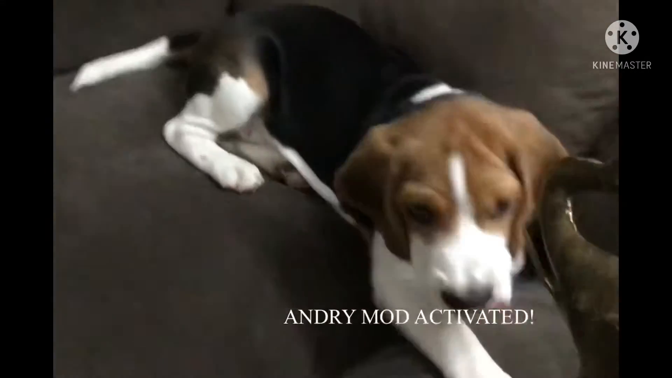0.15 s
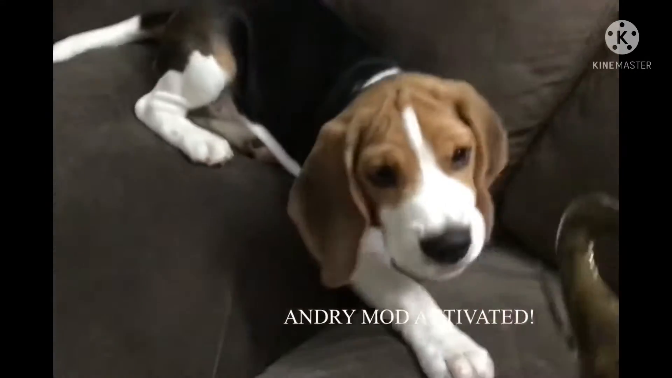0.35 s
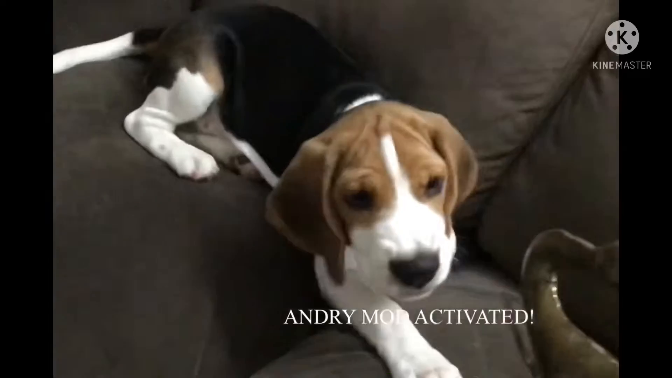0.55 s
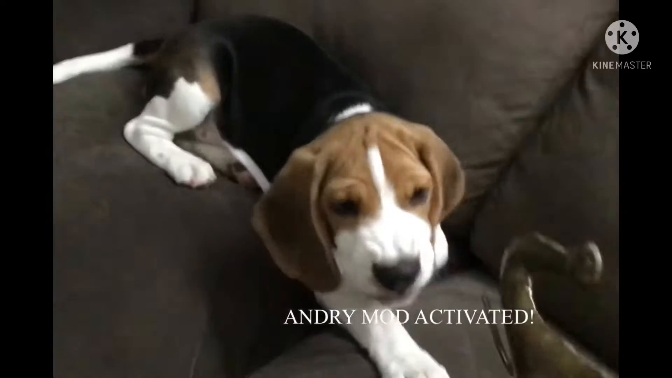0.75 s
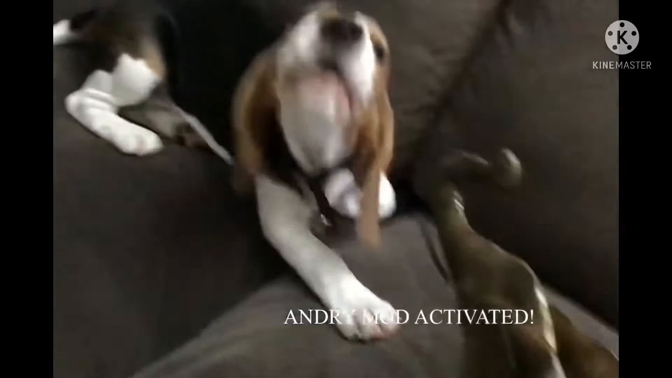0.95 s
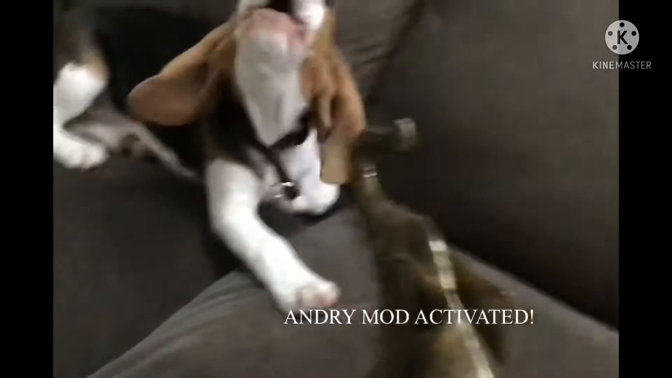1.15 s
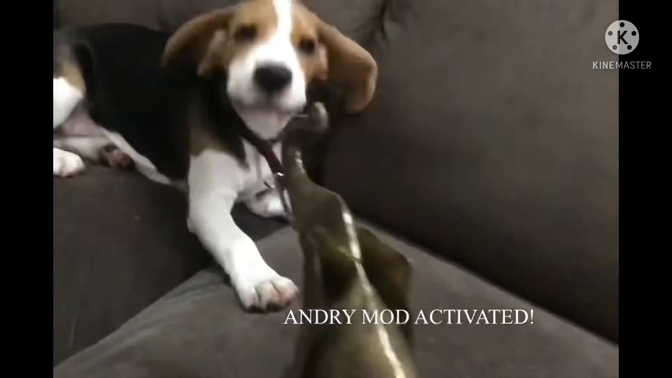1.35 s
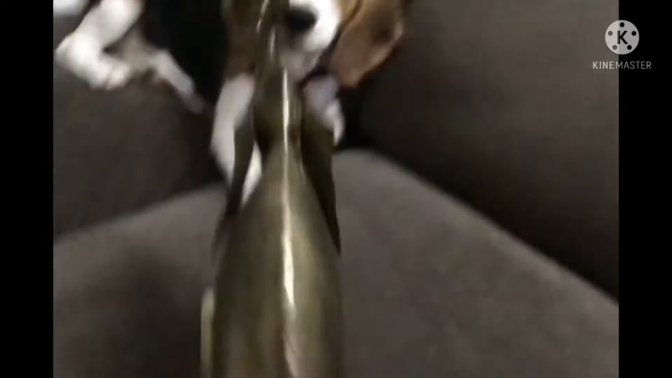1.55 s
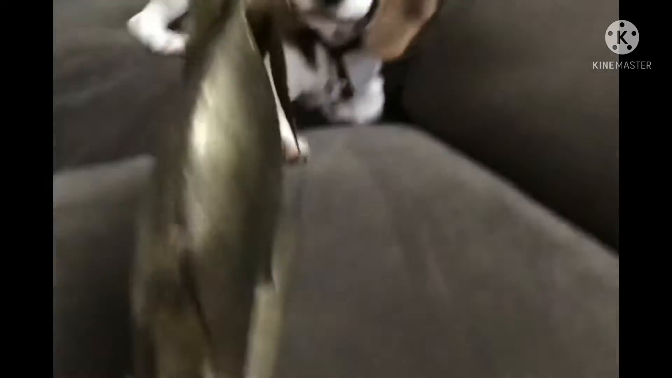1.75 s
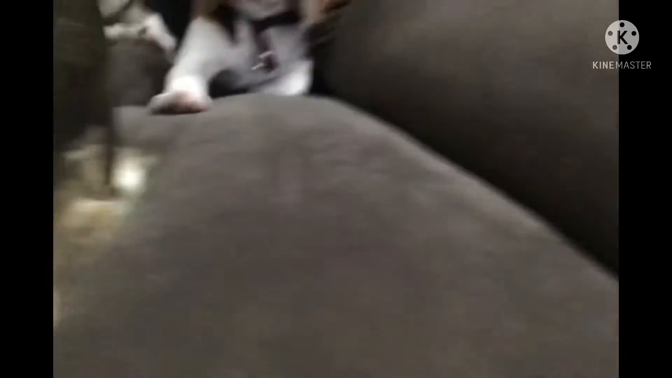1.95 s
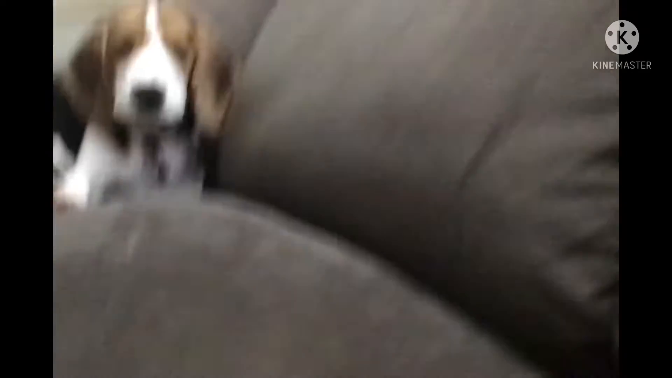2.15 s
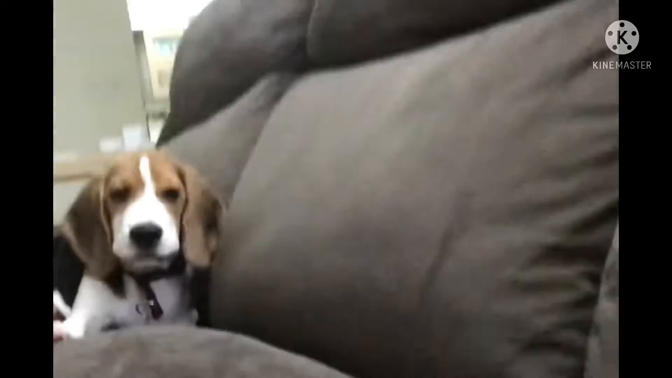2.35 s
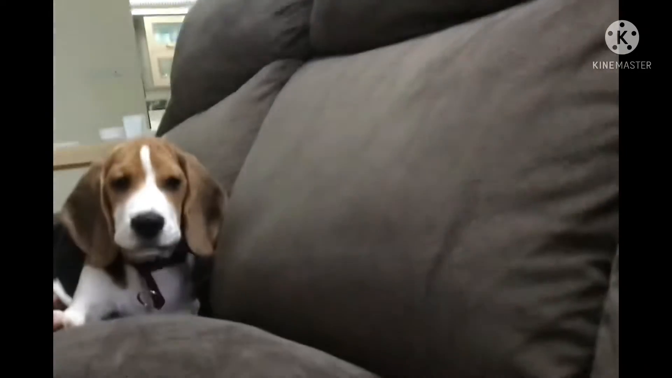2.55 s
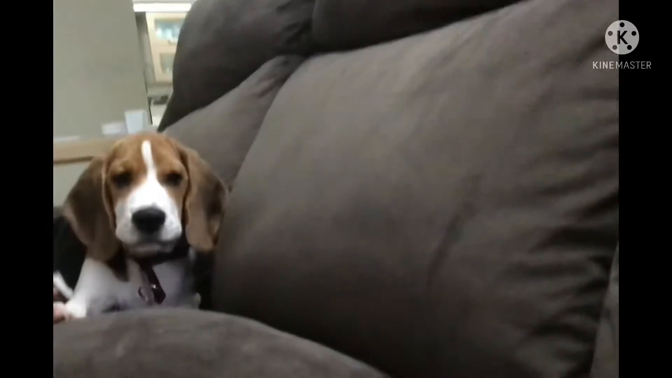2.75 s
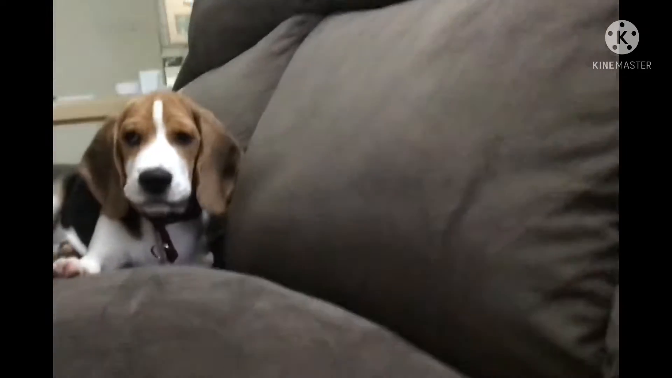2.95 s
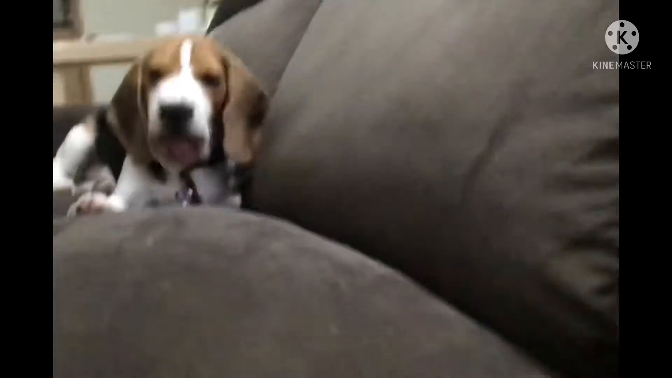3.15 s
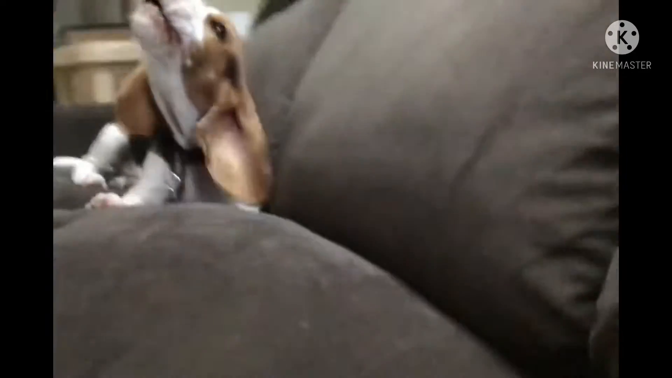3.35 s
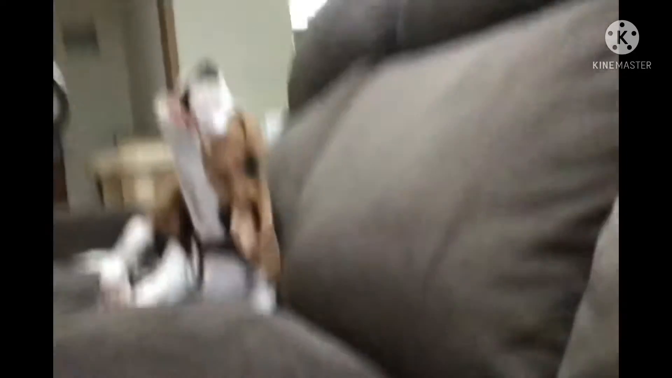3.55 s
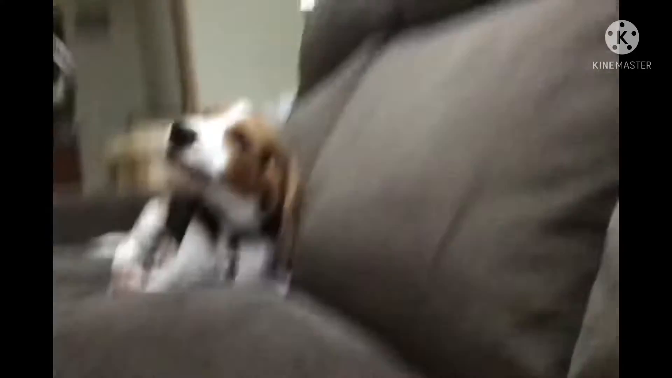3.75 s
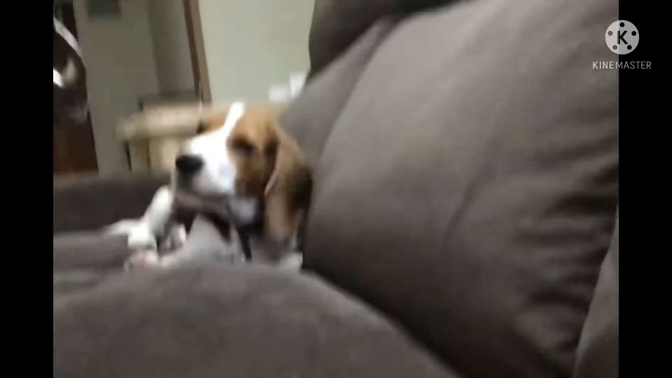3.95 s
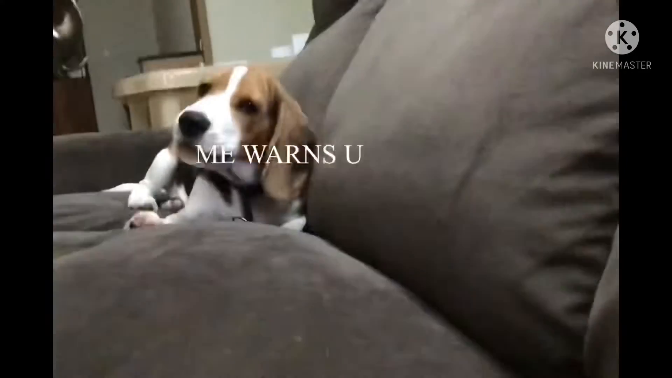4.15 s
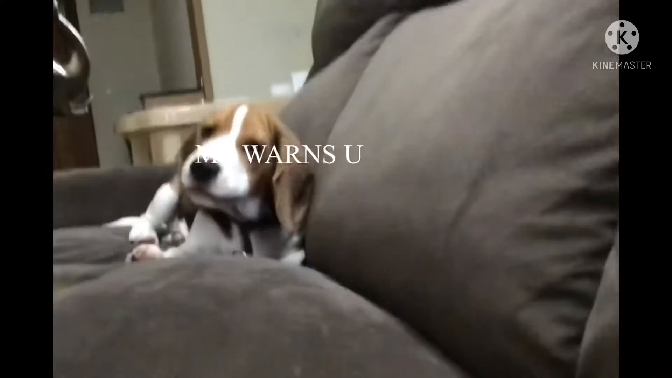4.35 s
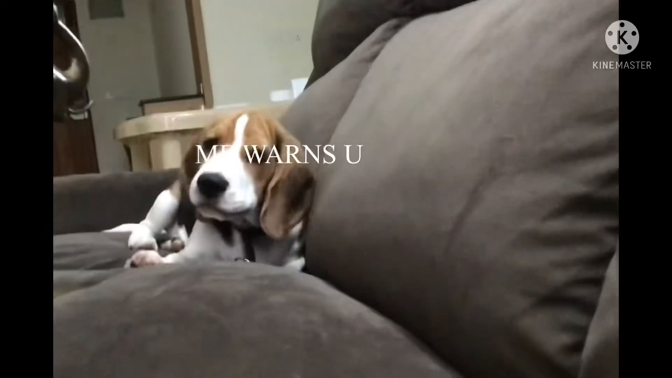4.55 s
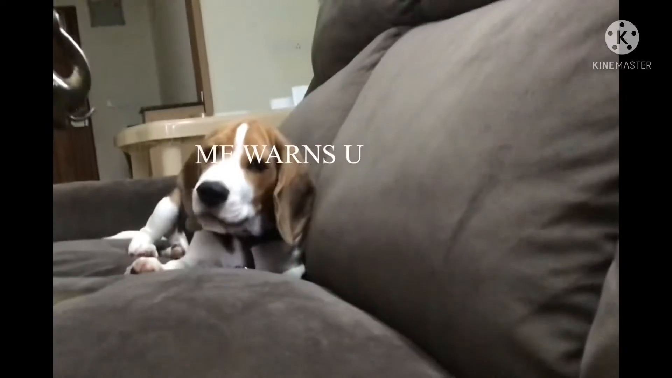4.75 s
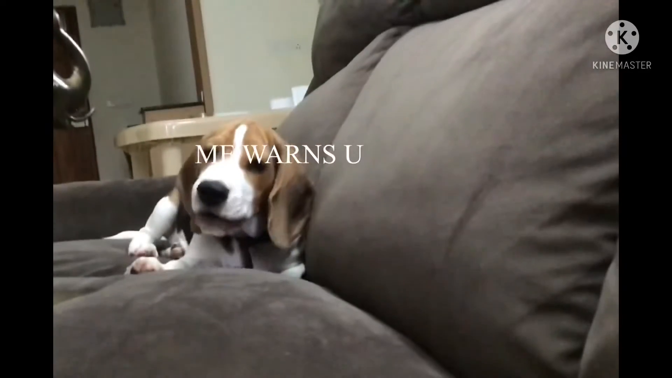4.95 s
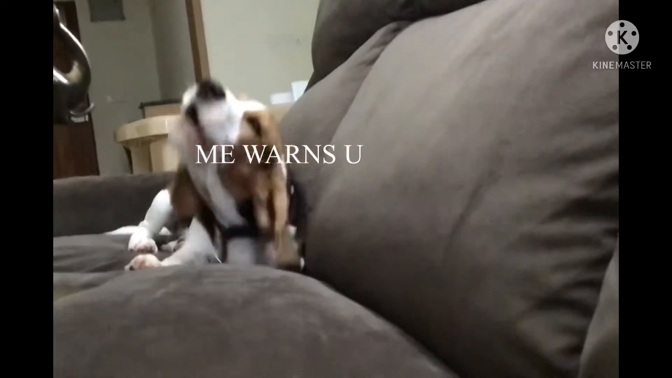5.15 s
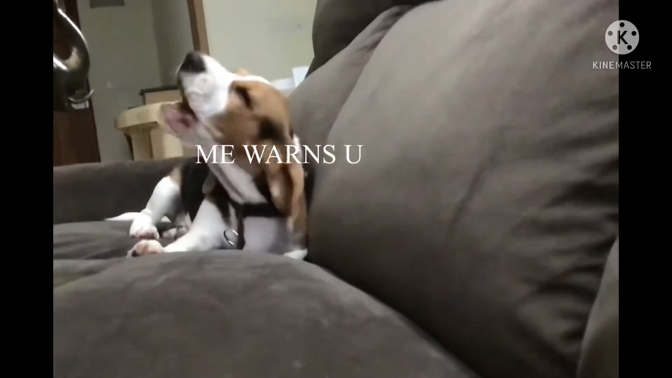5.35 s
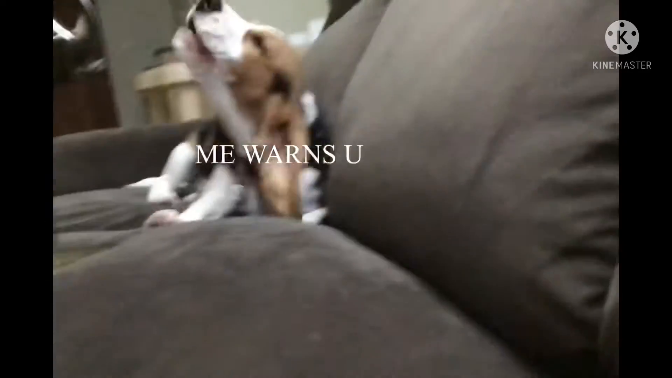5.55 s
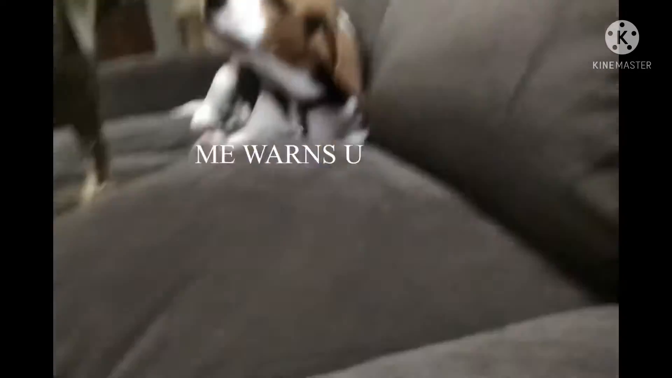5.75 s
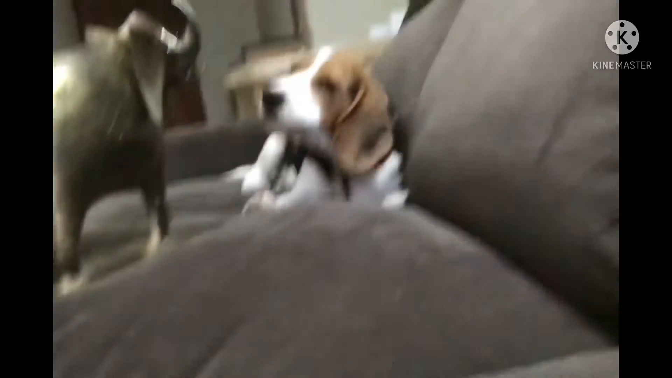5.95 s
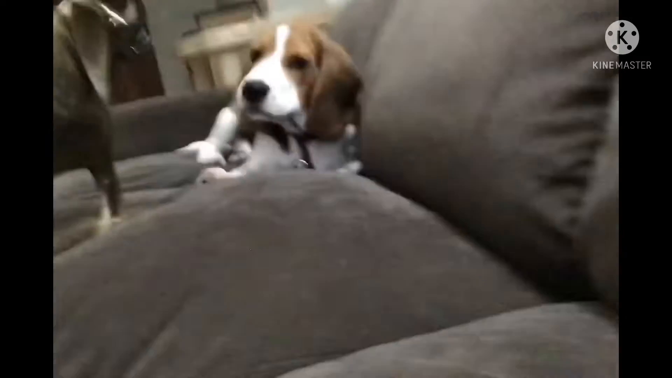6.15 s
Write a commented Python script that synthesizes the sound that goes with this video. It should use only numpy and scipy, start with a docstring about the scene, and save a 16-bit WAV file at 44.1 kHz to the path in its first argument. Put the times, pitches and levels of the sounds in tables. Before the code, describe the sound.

Close, handheld indoor sound of a puppy on a padded sofa. Faint rumble, hush and cloth rustle, a tiny low purr of taps, then a very loud double bark that overloads slightly. Cushion pops and soft thumps follow. A second double bark comes midway, then a quieter pause, and a hoarser, rougher double bark near the end. Every bark leaps up, then slides down, leaving a short room echo.

```python
"""Faint rumble, room hush and rustling cloth come first, then a short low purr of taps.
A puppy on a sofa then bays three double barks at close range in a lively living room: gliding partials
through mouth, throat and nose, plus breath noise. Cushions pop and thump as falling sine sweeps;
faint sliding sines squeak and whine. A fast limiter and soft clipping hold down the loudest peaks."""
import sys
import numpy as np
from scipy import signal
from scipy.fft import rfft, irfft, next_fast_len
from scipy.io import wavfile
from scipy.ndimage import uniform_filter1d, minimum_filter1d, map_coordinates

SR = 44100
rng = np.random.default_rng(int(sys.argv[2]) if len(sys.argv) > 2 else 0)


def int16_out(signal):
    """Quantize to a 16-bit WAV file."""
    q = np.round(np.clip(np.atleast_2d(signal).T, -1, 1) * 32767)
    wavfile.write(sys.argv[1], SR, q.astype(np.int16))


N = 277830

# Voice track of each of six barks: t/s, pitch f/Hz, level/dB, mouth opening/0-1, roughness/0-1 (clipped)
BARKS = [
    [(.878, 805.6, -45, .2, .3), (.892, 896.2, -29.5, 0.4, .1), (.899, 916.8, 0, .25, 0.13),
     (.918, 935.3, -3.5, 0.3, 0.1), (.935, 874.9, 3, 0.4, .05), (.963, 772.6, 0.5, 0.62, .1),
     (1.005, 736.7, 0.5, .4, 0.03), (1.035, 660.8, -5, .4, .4), (1.07, 553.7, -11.5, 0.3, 0.44),
     (1.126, 535.4, -14.5, 0.29, 0.18)],
    [(1.126, 533.1, -11, 0.4, 0.4), (1.172, 639.8, -3, 0.2, .05), (1.205, 683.1, -4.5, 0.06, .05),
     (1.24, 672.8, -6.5, 0.27, 0.03), (1.285, 631.7, -7.5, 0.1, 0.06), (1.315, 586.9, -15.5, 0.06, 0),
     (1.36, 510.2, -31, 0.66, 0.2), (1.45, 357, -61, 0, .4)],
    [(3.21, 741.7, -28.5, 0.88, .05), (3.226, 842.5, -7, 0.4, 0.2), (3.243, 884.6, -5, 0.52, .05),
     (3.28, 807.7, -4, .35, .05), (3.304, 747.7, -7, 0.7, .05), (3.356, 646.4, -6, 0.56, 0),
     (3.418, 559.8, -16, 0.52, .15), (3.48, 502.8, -32.5, 0.2, 0.3)],
    [(3.52, 476.2, -30.5, 0.5, 0.3), (3.55, 551.7, -22.5, 0.37, 0.2), (3.568, 673, -14, 0.33, 0.2),
     (3.585, 707.5, -10, .05, .05), (3.615, 701.7, -12.5, 0.13, .05), (3.64, 692.6, -11, 0, .05),
     (3.682, 625.5, -15.5, 0, .05), (3.72, 540, -23, 0.26, .2), (3.788, 465.2, -45.5, 0.15, 0.3),
     (3.85, 352.1, -55, 0, 0.3)],
    [(5.096, 713.9, -25, 0.5, .3), (5.126, 746.4, -12.5, .95, 0.1), (5.131, 749.3, -16, 0.8, 0.9),
     (5.141, 592.2, -19.5, 1, 0.9), (5.15, 567.6, -13.5, 1, 0.5), (5.17, 631.5, -14.5, 0.9, 0.4),
     (5.186, 672.8, -10.5, 0.9, 1), (5.203, 717.2, -8.5, 0.5, 0.3), (5.23, 643.5, -9, .4, .15),
     (5.277, 566.4, -19.5, 0.34, 0.1), (5.315, 503.7, -28, 0.7, 0.6), (5.34, 398.8, -31.5, 0.83, 1.1),
     (5.4, 270.4, -44.5, 0.91, 1.1), (5.455, 439.6, -34.5, 0.67, 1)],
    [(5.455, 501, -28.5, 0.61, 1), (5.468, 523.5, -26.5, 0.7, .35), (5.505, 507.2, -23.5, 0.7, .22),
     (5.54, 545, -16.5, 0.7, 0.3), (5.561, 567.5, -16.5, 0.7, 0.5), (5.565, 688.4, -13.5, 0.6, 0.8),
     (5.573, 699, -7.5, 0, 0.1), (5.612, 654.8, -13.5, 0.21, .05), (5.625, 611, -14.5, 0.19, 0.1),
     (5.663, 535.6, -25.5, 0.49, 0.13), (5.749, 350, -48, 0.81, 0.05), (5.8, 365.8, -40.5, 0.31, 0.42)],
]
# Per bark: room level/dB, nasal treble offset/dB, throat-nose gap level/dB, turbulent haze level/dB
BARK_MIX = [(-11, 0.5, -62, -34), (-14, -3.5, -48, -41.5), (-12, -1, -63.5, -34), (-10, -1.5, -53, -38),
            (-12.5, -5, -56.5, -26.5), (-10, 0, -59, -27)]
# Per bark: nasal hiss relative to nasal partials, level/dB
NASAL_HISS_DB = [-15, -16, -15, -15, -5, -6]
# Tilt of the partials above the second: t/s, slope/(dB per octave)
PARTIAL_TILT = [(.9, 4), (.96, -14), (1.05, -10), (1.2, -11.5), (1.27, -4), (1.32, -11.5), (3.22, 5.5),
                (3.3, -4.5), (3.42, -8), (3.53, 0), (3.6, 4), (3.68, -1), (3.75, -5), (5.1, 6.5),
                (5.18, -2.5), (5.21, -7), (5.3, -10.5), (5.43, -16), (5.46, 1.5), (5.5, 5.5), (5.555, 4.5),
                (5.58, -6.5), (5.7, -1.5)]
# Moving throat resonance: t/s, f/Hz
THROAT_RING = [(.9, 2700), (1.0, 2370), (1.06, 2520), (1.19, 2080), (1.3, 2060), (3.24, 2528), (3.35, 2400),
               (3.6, 2850), (3.69, 1760), (3.76, 1490), (5.11, 3050), (5.16, 2440), (5.25, 1900),
               (5.48, 2420), (5.55, 2210)]
# Brief breaks into the upper register: t/s, pitch f/Hz, level/dB, Gaussian 1/e half-length/s
CRACKS = [(5.139, 790, -7.5, 0.0045), (5.1764, 802.5, -5, 0.0021), (5.458, 727, -22, 0.005)]
# Throat response, referred to its first row: f/Hz, level/dB
THROAT = [(1600, 10.5), (2400, 6.5), (2900, -4), (3500, -8.5), (3800, -14), (4100, -37), (4700, -27.5),
          (5600, -55.5), (16000, -89.5)]
# Mouth response, lips nearly closed: f/Hz, level/dB
LIPS_CLOSED = [(250, 32), (450, -0.5), (680, 1), (930, 1), (1100, -9), (1400, -30.5), (1750, -30.5),
               (2100, -14.5), (2450, -28), (2850, -17), (3100, -22), (3370, -11.5), (3600, -26.5)]
# Mouth response, jaws wide: f/Hz, level/dB
JAWS_WIDE = [(250, -8.5), (500, -14), (740, -2), (930, -8), (1150, -2.5), (1500, 2.5), (1800, -6),
             (2200, -7.5), (2550, 4), (2900, 0), (3200, -3), (3600, -1)]
# Nose response and hiss shape: f/Hz, relative level/dB
NOSE = [(5000, -35), (6200, -17), (7000, -7.5), (8200, -6), (10500, -8.5), (12500, -19), (16000, -21.5)]
# Breath hiss shape: f/Hz, relative level/dB per Hz
BREATH = [(300, -42), (600, 2), (1100, -3.5), (1500, -8), (2500, -9), (3400, -9), (4000, -26),
          (4700, -14.5), (5600, -33.5), (16000, -51.5)]
# Shape of turbulent air in the open mouth: f/Hz, relative level/dB per Hz
HAZE = [(500, -23.5), (1200, 2.5), (3000, -0.5), (3700, -5), (4050, -27.5), (4700, -15), (5600, -28),
        (7000, -50.5)]
# Cushion pops, levels before trim: t/s, click level/dB, thump level/dB, bright edge level/dB
POPS = [(1.1573, -18, -43, -61), (1.202, -10.5, -42, -25), (1.5839, -26, -36.5, -31),
        (1.59, -32.5, -56, -49), (1.74, -27, -64, -42.5), (1.7513, -33.5, -48, -52),
        (1.7834, -29.5, -40, -51.5), (1.7946, -42, -40.5, -55), (1.863, -24.5, -33, -70),
        (1.9028, -45, -34.5, -58.5), (1.9096, -26.5, -30, -54.5), (1.914, -35, -30, -58.5),
        (1.9936, -20.5, -40.5, -38), (2.1978, -37.5, -39.5, -70), (2.308, -45.5, -28, -66),
        (2.3477, -44, -38.5, -51), (2.3942, -43.5, -36, -69), (2.4352, -18.5, -33, -28.5),
        (2.5443, -57.5, -34, -69), (3.5924, -20, -30, -37.5), (3.713, -24.5, -60, -63.5),
        (3.8652, -21.5, -49, -34.5), (3.9587, -48, -43.5, -73), (4.2215, -38.5, -28, -87),
        (5.439, -26, -44, -63), (6.0591, -27.5, -31.5, -82), (6.1942, -32.5, -25.5, -52),
        (6.21, -32.5, -50.5, -47.5)]
# Faint sliding tones, one list each: t/s, f/Hz, level/dB
SLIDING_TONES = [
    [(2.445, 600, -52), (2.46, 516, -44), (2.485, 400, -50.5)],
    [(6.197, 5320, -59), (6.215, 6090, -62), (6.25, 6960, -63.5), (6.275, 5130, -56.5)],
    [(4.25, 269, -53), (4.296, 282, -50), (4.34, 241.2, -48), (4.42, 237, -68)],
]
# Rumble on the microphone port: t/s, level/dB
RUMBLE_LEVEL = [(0, -54.5), (.8, -52.5), (1.3, -59), (3.1, -55), (3.9, -60.5), (5, -65.5), (6.3, -62.5)]
# Rumble shape: f/Hz, relative level/dB per Hz
RUMBLE_SHAPE = [(20, -49), (45, -23), (75, -2.5), (110, -9.5), (250, -15.5), (400, -24.5), (700, -66)]
# Lumps of air and handling on the port: t/s, peak level/dB, rise/s and fall/s (each over 20 dB)
LUMPS = [(.9, -30, 0.0078, .06), (0.979, -4.5, 0.024, 0.045), (1.05, -22, 0.031, 0.034),
         (1.21, -34.5, 0.058, 0.045), (2.419, -34, 0.045, 0.064), (3.32, -28, 0.1, 0.061),
         (3.63, -41.5, 0.017, 0.046), (4.21, -44.5, 0.06, 0.059), (5.2, -30.5, 0.042, 0.014),
         (5.39, -51, 0.032, 0.034)]
# Lump noise shape: f/Hz, relative level/dB per Hz
LUMP_SHAPE = [(20, -55), (52, -15), (80, -0.5), (105, -9), (170, -13.5), (250, -26.5), (400, -30),
              (700, -67.5)]
# Hush and cloth, before trim: t/s, hush level/dB, cloth level/dB
RUSTLE_LEVELS = [(0, -48, -59.5), (.26, -59.5, -65), (.4, -54.5, -61), (.56, -59, -68.5),
                 (.87, -58.5, -70.5), (1.7, -62.5, -77), (1.78, -63, -70), (2.01, -85.5, -81),
                 (2.23, -59.5, -77), (2.34, -55.5, -65.5), (2.46, -53, -63.5), (2.52, -70.5, -82),
                 (3, -62.5, -80.5), (3.17, -52.5, -56), (4.3, -63.5, -82.5), (5.08, -71, -81),
                 (6, -58.5, -64.5), (6.18, -53, -63.5), (6.3, -68, -58.5)]
# Room hush shape: f/Hz, relative level/dB per Hz
HUSH_SHAPE = [(180, -24.5), (300, -8), (571, -7.5), (1070, -16.5), (2000, -21.5), (2600, -35), (4400, -120)]
# Cloth shape: f/Hz, relative level/dB per Hz
CLOTH_SHAPE = [(880, -30), (1500, -4), (3660, -1.5), (5280, -6), (9850, -13.5), (16000, -16)]
# Decay time of the main room tail: f/Hz, t60/s
ROOM_T60 = [(200, 1), (700, 0.63), (2100, 0.69), (3400, 0.26), (4100, 0.25), (4700, 0.41), (10000, 0.28)]
# Colour of the room tail: f/Hz, relative level/dB
ROOM_COLOUR = [(700, -0.5), (2100, 0.5), (3400, 5.5), (4700, 4)]
# Early wall echoes: delay t/s, level/dB
WALLS = [(.009, -20), (.014, -16), (.021, -18)]

NOSE_BASE_DB, NOSE_OPEN_JAW_DB, NOSE_DB_PER_VOICE_DB = -38.5, 21.5, 0.94
RING_DB, RING_WIDTH_HZ = 7, 270
GAP_HZ, GAP_WIDTH_HZ = 5270, 880  # valley between throat and nose
PATCHY_DB_PER_OCTAVE = 2  # random unevenness of the partials
HOARSE_SCATTER = 0.55  # random amplitude swing at full roughness
BREATH_DB, BREATH_DB_PER_VOICE_DB = -54, 0.046
RASP_DB = -13.5  # hiss relative to the voice at full roughness
BREATH_LEAD_S, BREATH_FADE_S = 0.0049, 0.075
TOP_HZ = 16200


def amp(db):
    """Amplitude factor from dB."""
    return 10 ** (np.asarray(db) / 20)


def unit(x):
    """Scale to rms 1."""
    return x / np.sqrt(np.mean(x ** 2) + 1e-20)


def along(points, hz):
    """Interpolate (f/Hz, value) rows on a log frequency axis."""
    f, v = np.transpose(points)
    return np.interp(np.log(hz + 1), np.log(f + 1), v)


def curves(rows):
    """One value per sample for each column after the time."""
    s, *cols = np.transpose(sorted(map(tuple, rows), key=lambda row: row[0]))
    return [np.interp(np.arange(N) / SR, s, c) for c in cols]


def wobble(rate_hz, order=3):
    """Random curve through rate_hz knots a second."""
    knots = rng.standard_normal(int(N * rate_hz / SR) + 4)
    return map_coordinates(knots, [np.arange(N) * rate_hz / SR], order=order)


def filtered(x, response):
    """Multiply the spectrum by response(f/Hz)."""
    m = next_fast_len(N + SR // 2)
    return irfft(rfft(x, m) * response(np.fft.rfftfreq(m, 1 / SR)), m)[:N]


def noise(shape):
    """Coloured noise of rms 1."""
    return unit(filtered(rng.standard_normal(N), lambda hz: amp(along(shape, hz))))


def sounding(tables, size):
    """Gate: 1 inside each table's time span, 0 outside, edges averaged over size samples."""
    on = np.zeros(N)
    for rows in tables:
        on[round(rows[0][0] * SR):round(rows[-1][0] * SR) + 1] = 1
    return uniform_filter1d(on, size)


def puppy():
    """Vocal-fold partials through mouth, throat and nose, unsteady when hoarse; breath swells once a cycle."""
    hz, level_db, mouth, rough = uniform_filter1d(curves(np.concatenate(BARKS)), size=200, axis=1)
    mouth, rough = np.clip(mouth, 0, 1), np.clip(rough, 0, 1)
    mix_rows = []
    for rows, (_, *mix), hiss_db in zip(BARKS, BARK_MIX, NASAL_HISS_DB):
        for row in (rows[1], rows[-2]):
            mix_rows.append((row[0], *mix, hiss_db))
    nasal_db, gap_db, haze_db, nasal_hiss_db = curves(mix_rows)
    nose_db = NOSE_BASE_DB + NOSE_DB_PER_VOICE_DB * level_db + NOSE_OPEN_JAW_DB * mouth + nasal_db
    (tilt_db,), (ring_hz,) = curves(PARTIAL_TILT), curves(THROAT_RING)
    jitter = (0.0028 + 0.015 * rough + 0.028 * rough ** 2) * wobble(250)
    phase = 2 * np.pi * np.cumsum(hz * (1 + jitter)) / SR

    voiced = np.zeros(N)
    for k in range(1, 26):
        partial_hz = k * hz
        mouth_db = (1 - mouth) * along(LIPS_CLOSED, partial_hz) + mouth * along(JAWS_WIDE, partial_hz)
        throat_db = level_db + mouth_db + along(THROAT, partial_hz) - THROAT[0][1]
        throat_db += RING_DB * np.exp(-((partial_hz - ring_hz) / RING_WIDTH_HZ) ** 2)
        uneven = wobble(55, order=1)
        throat_db += tilt_db * np.log2(max(k / 2, 1)) + PATCHY_DB_PER_OCTAVE * np.log2(k) * uneven
        nose_partial_db = nose_db - 5 + along(NOSE, partial_hz) + 7 * wobble(70, order=1)
        nose_partial_db -= 9 * np.clip(partial_hz / 3000 - 3.6, 0, 1)
        nose = amp(nose_partial_db) * (1 - rough) ** 2  # lost when hoarse
        gap_shape_db = -6 * ((partial_hz - GAP_HZ) / GAP_WIDTH_HZ) ** 4
        nose += amp(2 * level_db + gap_db + gap_shape_db + 6 * uneven)
        shimmer = 1 + 0.1 * rough * wobble(400, order=1)
        voiced += (amp(throat_db) + nose) * shimmer * np.sin(k * phase + rng.uniform(0, 2 * np.pi))
    voiced *= 1 + HOARSE_SCATTER * rough ** 2 * wobble(300)

    nasal_hiss = amp(nose_db + nasal_hiss_db + 3 * wobble(120)) * noise(NOSE)
    hiss_gain = amp(BREATH_DB + BREATH_DB_PER_VOICE_DB * level_db) + rough ** 1.5 * amp(level_db + RASP_DB)
    haze = amp(level_db + haze_db) * unit(amp(4.9 * wobble(150)) * noise(HAZE))
    breath = (hiss_gain * noise(BREATH) + nasal_hiss + haze) * (1 + 0.5 * np.cos(phase))
    flow_spans = [[(rows[0][0] - BREATH_LEAD_S,), rows[-1]] for rows in BARKS]
    flowing = sounding(flow_spans, size=400)
    step = 1 / (BREATH_FADE_S * SR)
    fading = signal.lfilter([step], [1, step - 1], flowing)  # one-pole decay after the bark
    flowing = np.maximum(flowing, fading)
    return sounding(BARKS, size=160) * np.sqrt(2) * voiced + flowing * breath


def cracks():
    """Short Gaussian bursts of the upper register with a strong second partial."""
    out, t = np.zeros(N), np.arange(N) / SR
    for s, hz, db, length_s in CRACKS:
        tone = np.sin(2 * np.pi * hz * t) + 0.49 * np.sin(4 * np.pi * hz * t)
        out += amp(db) * np.exp(-((t - s) / length_s) ** 2) * tone
    return out


def cushion():
    """Each pop is a dry click and noisy edge; a slower thump slides down through the padding."""
    out, t = np.zeros(N + SR), np.arange(SR // 10) / SR
    grit = rng.standard_normal((len(POPS), 2, len(t)))
    click_hz = 800 + 3200 * np.exp(-t / 0.00056)
    click_tone = np.sin(2 * np.pi * np.cumsum(click_hz) / SR)
    click_envelope = amp(-60 * t / 0.01) * (1 - np.exp(-t / 0.00015))
    thump_hz = 95 + 650 * np.exp(-t / 0.0043)
    thump_tone = np.sin(2 * np.pi * np.cumsum(thump_hz) / SR)
    thump_envelope = amp(-60 * t / 0.05) * (1 - np.exp(-t / 0.012))
    for (s, click_db, thump_db, edge_db), (click_grit, edge_grit) in zip(POPS, 1.1 * grit):
        rough_click = 1 + click_grit * amp(-60 * t / 0.0036)
        click = amp(click_db - 3.5) * click_envelope * rough_click * click_tone
        edge_noise = edge_grit - np.roll(edge_grit, 2)
        edge = amp(edge_db + 12 - 60 * t / 0.00044) * edge_noise
        thump = amp(thump_db + 11) * thump_envelope * thump_tone
        out[round(s * SR):][:len(t)] += click + edge + thump
    return out[:N]


def squeaks():
    """Faint sliding sines: the cover groans and squeaks under a hand, the puppy whines softly."""
    out = np.zeros(N)
    for rows in SLIDING_TONES:
        hz, db = curves(rows)
        tone = np.sin(2 * np.pi * np.cumsum(hz) / SR)
        out += sounding([rows], size=300) * amp(db + 3.9 * wobble(80)) * tone
    return out


def rattle():
    """A short low purr: five quick taps, each ringing a high and a low decaying sine."""
    out, t = np.zeros(N), np.arange(SR // 40) / SR
    high = amp(-38.5 - 60 * t / 0.018) * np.sin(2 * np.pi * 620 * t)
    low = amp(-41 - 60 * t / 0.05) * np.sin(2 * np.pi * 190 * t)
    times_s = 0.4805 + 0.0128 * np.arange(5)
    for s, db in zip(times_s, rng.normal(0, 2.4, size=5)):
        out[round(s * SR):][:len(t)] += amp(db) * (high + low)
    return out


def swish():
    """A short brush of cloth: gated coloured noise just after a pop."""
    shape = [(300, 6), (900, -1), (2500, -38), (4700, -6), (6500, -31)]  # f/Hz, relative level/dB
    return amp(-49.5) * sounding([[(2.443,), (2.48,)]], size=500) * noise(shape)


def background():
    """Coloured noise: lumpy rumble on the port, the hush of the room and grainy cloth."""
    t = np.arange(N) / SR
    lumps = np.zeros(N)
    for s, db, rise_s, fall_s in LUMPS:
        lumps += amp(db - 20 * np.maximum((s - t) / rise_s, (t - s) / fall_s))
    hush_db, cloth_db = curves(RUSTLE_LEVELS)
    (rumble_db,) = curves(RUMBLE_LEVEL)
    rumble = amp(rumble_db + 2 * wobble(28)) * noise(RUMBLE_SHAPE)
    rumble += lumps * unit(amp(2.5 * wobble(30)) * noise(LUMP_SHAPE))
    hush = amp(hush_db - 3 + 0.4 * wobble(34)) * noise(HUSH_SHAPE)
    grain_db = 1.3 * wobble(28) + 2.1 * wobble(330)
    cloth = amp(cloth_db + 1.5) * unit(amp(grain_db) * noise(CLOTH_SHAPE))
    return rumble + hush + cloth


def room(x, wet_db):
    """Early wall echoes, then a tail decaying per frequency; a weaker part, the hall beyond, rings twice as long."""
    hz, t, z = signal.stft(rng.standard_normal(SR * 3 // 2), SR, nperseg=256)
    fall_db = -60 * t / along(ROOM_T60, hz)[:, None]
    decay = amp(fall_db) + amp(-16 + 0.5 * fall_db)
    colour = amp(along(ROOM_COLOUR, hz))[:, None]
    tail = signal.istft(z * colour * decay, SR, nperseg=256)[1]
    answer = np.pad(amp(wet_db) * tail / np.linalg.norm(tail), (700, 0))
    for s, db in WALLS:
        answer[round(s * SR)] += amp(db)
    return signal.fftconvolve(x, answer)


def scene():
    """Sum the sources; each bark excites the room at its own level."""
    voice = puppy() + cracks()
    out = voice + cushion() + squeaks() + rattle() + swish() + background()
    for rows, (wet_db, *_) in zip(BARKS, BARK_MIX):
        start, stop = round(rows[0][0] * SR), round(rows[-1][0] * SR)
        echo = room(voice[start:stop], wet_db)[:N - start]
        out[start:][:len(echo)] += echo
    return out[None]


def record(dry):
    """Microphone bass roll-off, fast look-ahead limiter, soft clipper, then band limit."""
    x = filtered(dry[0], lambda hz: (1j * hz / (40 + 1j * hz)) ** 2)
    limit_gain = 1.45 / np.maximum(np.abs(x), 1.45)
    x = x * uniform_filter1d(minimum_filter1d(limit_gain, size=180), size=60)
    x = x / (1 + np.abs(x) ** 16) ** (1 / 16)
    x = filtered(x, lambda hz: hz < TOP_HZ)
    return np.clip(1.01 * x, -1, 1)[None]


dry = scene()
out = record(dry)
int16_out(out)
```